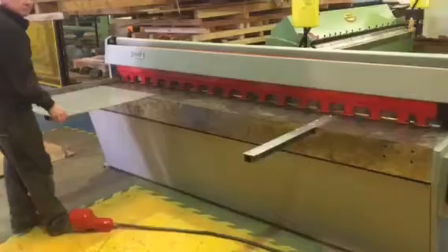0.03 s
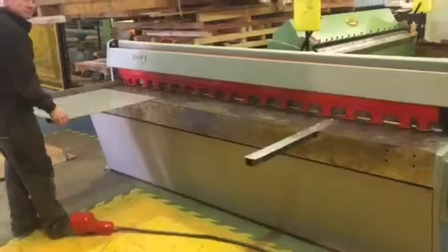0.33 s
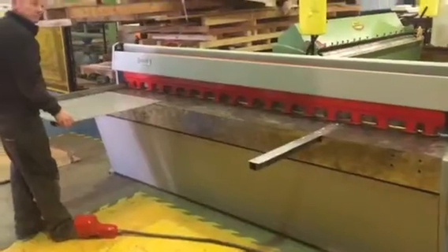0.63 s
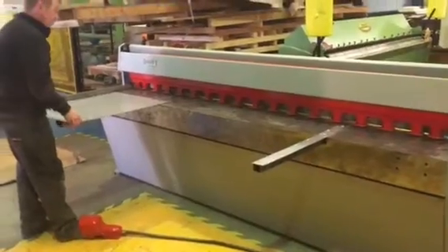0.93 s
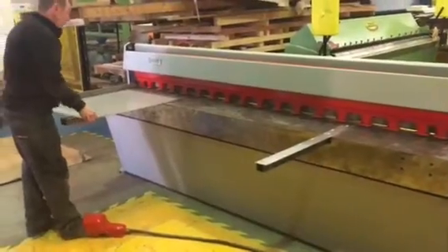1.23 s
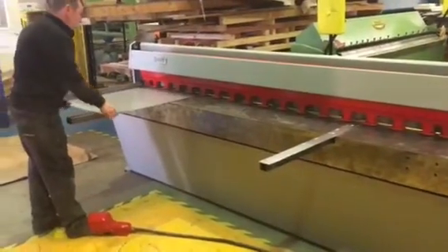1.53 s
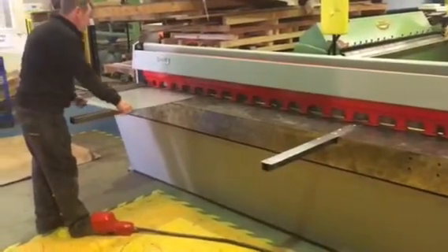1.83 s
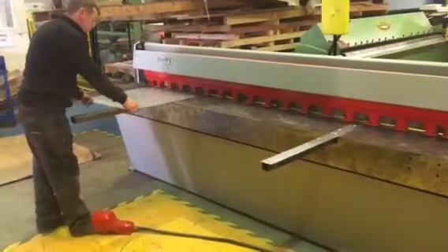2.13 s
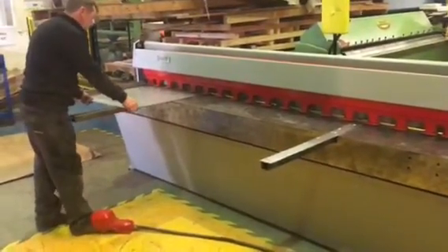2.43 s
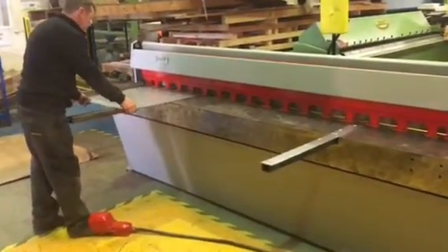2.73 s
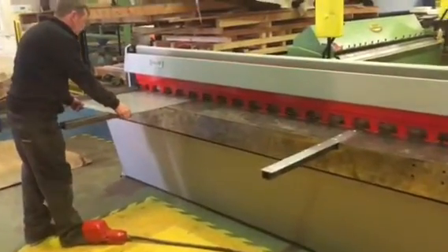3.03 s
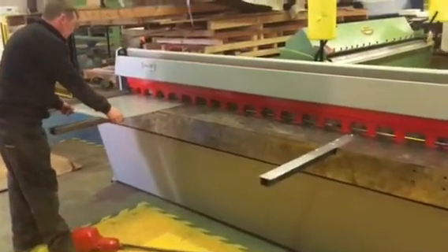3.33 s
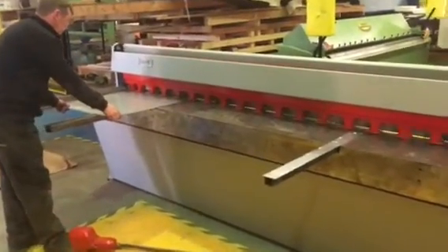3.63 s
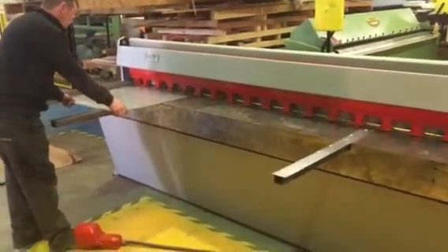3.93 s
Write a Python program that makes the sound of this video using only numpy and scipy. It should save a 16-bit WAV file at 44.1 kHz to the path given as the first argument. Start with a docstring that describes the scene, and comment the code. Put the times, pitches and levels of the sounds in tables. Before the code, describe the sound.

A sheet metal shear cuts once in a workshop. Over its idling hum, a sheet slides into place; a loud clank, juddering groan and crunch follow, then the offcut clinks, skids and briefly screeches as the blade knocks back.

```python
"""A workshop: a motor-driven guillotine shear idles while a steel sheet scrapes over its table.
The clutch bangs in, ringing the frame; the clamp judders down with a groan; the blade crunches through
and the strip snaps off. The gear whine sags and recovers, the strip clatters down behind in its
plate modes, and the beam knocks home over ringing steel."""
import sys
import numpy as np
from scipy import signal
from scipy.fft import rfft, irfft
from scipy.io import wavfile
from scipy.ndimage import map_coordinates

SR = 44100
rng = np.random.default_rng(int(sys.argv[2]) if len(sys.argv) > 2 else 0)


def wav_out(sig):
    """Save sig, one row per channel (or a flat mono array), as 16-bit PCM at SR to the path in sys.argv[1]."""
    wavfile.write(sys.argv[1], SR, np.round(np.clip(np.atleast_2d(sig).T, -1, 1) * 32767).astype(np.int16))


N = 4 * SR


def undb(db):
    return 10 ** (np.asarray(db) / 20)


def unit_rms(x):
    return x / np.sqrt(np.mean(x ** 2))


def clock():
    return np.arange(N) / SR


def curve(table, column=1):
    """One table column, linear in time between rows."""
    rows = np.array(table)
    return np.interp(clock(), rows[:, 0], rows[:, column])


def colour(x, points, centre_hz=1000, half_width_oct=None):
    """Minimum-phase filter of unit RMS gain through (Hz, dB) points, with an optional bell."""
    n, rows = 2 * len(x), np.array(points)
    log_f = np.log2(np.maximum(np.fft.rfftfreq(n, 1 / SR), 1))
    db = np.interp(log_f, np.log2(rows[:, 0]), rows[:, 1])
    if half_width_oct:
        db -= 20 * np.log10(1 + ((log_f - np.log2(centre_hz)) / half_width_oct) ** 2)
    cepstrum = irfft(np.log(unit_rms(undb(db))))
    cepstrum[1:n // 2] *= 2
    cepstrum[n // 2 + 1:] = 0
    return irfft(rfft(x, n) * np.exp(rfft(cepstrum)))[:len(x)]


def drift(rate_hz):
    """Random drift, unit RMS."""
    knots = rng.standard_normal(4000)
    return unit_rms(np.interp(clock() * rate_hz, np.arange(len(knots)), knots))


def tone(hz, wobble, rate_hz):
    """Unit-RMS sine; pitch wavers by the fraction `wobble`."""
    wavering_hz = hz * (1 + wobble * drift(rate_hz))
    return np.sqrt(2) * np.sin(2 * np.pi * np.cumsum(wavering_hz) / SR)


def chatter(per_s, spread_db, size=N):
    """Random metal contacts of uneven strength."""
    hits = rng.random(size) < per_s / SR
    signs = rng.choice([-1, 1], size)
    return unit_rms(hits * signs * undb(spread_db * np.clip(rng.standard_normal(size), -2, 2)))


def dense_ring(t60_s, size=SR):
    """Decaying noise, unit energy."""
    h = rng.standard_normal(size) * undb(-60 * np.arange(size) / SR / t60_s)
    return h / np.linalg.norm(h)


def modal_ring(modes):
    """Sum of damped sines, unit energy."""
    t = np.arange(SR) / SR
    h = sum(undb(db - 60 * t / t60) / np.sqrt(t60) * np.sin(2 * np.pi * hz * t) for hz, db, t60 in modes)
    return h / np.linalg.norm(h)


def convolve(x, h):
    return signal.fftconvolve(x, h)[:len(x)]


def swell(at_s, sigma_s):
    return np.exp(-.5 * ((clock() - at_s) / sigma_s) ** 2)


# Machine and workshop noise: f/Hz, gain/dB
IDLE_SPECTRUM = [(25, -34), (55, -1.5), (115, -4.5), (155, -19.5), (230, -5.5), (380, -6.5), (480, -15.5),
                 (1300, -18.5), (2100, -21.5), (2700, -31.5), (9000, -38), (15500, -39)]
# Panel resonances: f/Hz, width/Hz, level/dB
PANEL_BANDS = [(75, 13, -51.5), (198.3, 37, -41), (236.9, 21.6, -42.5)]
# Hum: f/Hz, level/dB
HUM_TONES = [(98.5, -47), (614, -52.5)]
# Motor whine: t/s, level/dB
WHINE_ENVELOPE = [(0, -49), (1.2, -47.5), (1.32, -46.5), (1.75, -59)]


def motor_idle(whine_hz=1029):
    """Motor and flywheel: droning panels, hum and a thin whine over workshop noise."""
    out = undb(-38.5 + 0.15 * drift(4.55)) * colour(rng.standard_normal(N), IDLE_SPECTRUM)
    f = np.fft.rfftfreq(N, 1 / SR)
    for hz, width_hz, db in PANEL_BANDS:
        band = rfft(rng.standard_normal(N)) / (1 + (2 * (f - hz) / width_hz) ** 2)
        out += undb(db) * unit_rms(irfft(band, N))
    for hz, db in HUM_TONES:
        out += undb(db + drift(7.1)) * tone(hz, 0.0057, 25.04)
    return out + undb(curve(WHINE_ENVELOPE) + 0.72 * drift(17.8)) * tone(whine_hz, 0.0015, 9.75)


# Sheet on table: t/s, level/dB
SCRAPE_ENVELOPE = [(.88, -70), (1.0, -45), (1.28, -42), (1.66, -40.5), (1.85, -47), (1.93, -40),
                   (2.03, -44), (2.2, -57)]
# Scrape: f/Hz, gain/dB
SCRAPE_SPECTRUM = [(200, 4.5), (700, 4.5), (2600, -7), (3250, -5.5), (4000, -8), (6400, -5.5), (7600, -11),
                   (9400, -7.5), (10500, -19)]
# Sheet catches: t/s
SCUFF_TIMES_S = [1.902, 1.926, 1.992]
# Squeals: t/s, sigma/s, f/Hz, level/dB, wobble/fraction
SHEET_SQUEALS = [(1.307, 0.024, 1055, -44, .04), (1.38, 0.15, 6540, -50, 0.0072)]


def sheet_slide():
    """The sheet scrapes over the table, catches and briefly squeals."""
    scuff_db = 5 * sum(swell(at, sigma_s=0.004) for at in SCUFF_TIMES_S)
    scrape = colour(chatter(9000, 2.3), SCRAPE_SPECTRUM)
    scrape *= undb(curve(SCRAPE_ENVELOPE) + scuff_db + 1.4 * drift(70))
    squeals = sum(undb(db) * swell(at, sigma_s) * tone(hz, wobble, 450)
                  for at, sigma_s, hz, db, wobble in SHEET_SQUEALS)
    return scrape + squeals


# Blows: t/s, level/dB, hold/s, release/s, centre/Hz, half-width/oct
FRAME_BLOWS = [(2.408, -29, 0.0032, 0.01, 3020, 4.3), (2.43, -13.5, 0.022, 0.011, 3600, 0.55),
               (2.433, -18, 0.024, 0.083, 1170, 3.4), (2.497, -25, 0.045, 0.021, 1070, 0.45),
               (2.69, -17.5, 0.051, 0.046, 487, 0.76), (2.776, -9.5, 0.027, 0.043, 450, 1.94),
               (2.886, -13.5, 0.026, 0.039, 5900, 0.84), (2.897, -15.5, 0.019, 0.027, 1540, 0.71),
               (3.631, -18, 0.021, 0.025, 420, 1.7), (3.66, -13, 0.029, 0.028, 1020, 1.55),
               (3.661, -15.5, 0.052, 0.018, 356, 0.19), (3.674, -19, 0.022, 0.023, 3820, 0.45),
               (3.705, -21, 0.027, 0.022, 105, 0.45)]
# Frame: f/Hz, gain/dB
FRAME_SPECTRUM = [(30, -34), (105, 13), (380, -0.5), (480, -8), (650, 1), (1300, -3), (3500, -6),
                  (6500, -14), (15500, -16.5)]


def frame_blows(attack_s=0.001):
    """Clutch, blade, snap and return: each a burst of contacts ringing its own band of the frame."""
    out, t = np.zeros(N + SR), np.arange(SR // 2) / SR
    for at, db, hold_s, release_s, hz, half_width_oct in FRAME_BLOWS:
        envelope = np.minimum(t / attack_s, 1) * np.exp(-np.maximum(t - hold_s, 0) / release_s)
        contacts = unit_rms(convolve(chatter(1900, 2.3, size=len(t)), dense_ring(0.014, size=1024)))
        i = int(at * SR)
        out[i:i + len(t)] += undb(db) * colour(contacts * envelope, FRAME_SPECTRUM, hz, half_width_oct)
    return out[:N]


# Frame modes: f/Hz, level/dB, T60/s
FRAME_RESONANCES = [(76.1, 7.5, 0.38), (101.3, 0, 0.29), (751, -5.5, 0.24), (1279, 3, 0.43)]


def frame_ring(drive):
    """The frame rings on in its low modes."""
    return undb(-20) * convolve(drive, modal_ring(FRAME_RESONANCES))


# Blade and linkage load: t/s, crunch/dB, rumble/dB
LOAD_ENVELOPE = [(2.42, -34, -55), (2.46, -20.5, -27), (2.66, -21, -23.5), (2.75, -20, -17.5),
                 (2.8, -14, -17), (2.98, -20, -22), (3.08, -23, -35.5), (3.5, -28.5, -32.5),
                 (3.8, -25, -31.5), (4, -27.5, -43)]
# Crunch: f/Hz, gain/dB
CRUNCH_SPECTRUM = [(100, -27.5), (270, 7.5), (500, 0.5), (1500, 0.5), (2600, -5), (3400, -7.5), (6500, -16),
                   (15500, -54)]
# Rumble: f/Hz, gain/dB
RUMBLE_SPECTRUM = [(25, -18), (72, 0), (120, 9), (160, -6.5), (300, -1.5), (2000, -53.5)]
# Steel grinding and tearing: t/s, level/dB
TEAR_ENVELOPE = [(2.43, -33), (2.55, -31), (2.66, -37.5), (2.695, -27.5), (2.74, -25), (2.8, -22.5),
                 (2.86, -24), (2.93, -24), (3.0, -31), (3.1, -37.5), (3.25, -41.5)]
# Sheet steel, tearing or skidding: f/Hz, gain/dB
STEEL_SPECTRUM = [(2750, -16.5), (3200, 2), (4400, -4), (4900, -6), (9500, -4.5), (10300, -9), (15500, -20)]


def blade_stroke():
    """The loaded linkage crunches and rumbles; steel grinds under the clamp and tears along the blade."""
    crunch = colour(chatter(2200, 1.06), CRUNCH_SPECTRUM) * undb(curve(LOAD_ENVELOPE) + 1.63 * drift(60))
    rumble = colour(rng.standard_normal(N), RUMBLE_SPECTRUM) * undb(curve(LOAD_ENVELOPE, column=2))
    tear = colour(chatter(2500, 1.1), STEEL_SPECTRUM) * undb(curve(TEAR_ENVELOPE) + 1.1 * drift(70))
    return (crunch + rumble + tear) * (clock() > LOAD_ENVELOPE[0][0])


# Judders: t/s, level/dB
CLAMP_JUDDERS = [(2.478, -19), (2.5, -8), (2.517, -12.5), (2.535, -16), (2.553, -3.5), (2.561, -17),
                 (2.623, -12), (2.66, -11), (2.692, -15), (2.732, -11.5)]


def clamp_groan(start_hz=354, sag_hz_per_s=240, rise_s=0.0066):
    """The hold-down judders on the sheet with a sinking groan."""
    t, envelope = clock(), 0
    for at, db in CLAMP_JUDDERS:
        age = np.maximum(t - at, 0) / rise_s
        envelope += undb(db) * age * np.exp(1 - age)
    hz = start_hz - sag_hz_per_s * (t - CLAMP_JUDDERS[0][0])
    return undb(-7.5) * envelope * tone(hz, 0.0306, 90)


def plate_ring(modes_hz, t60_s=0.16, spread_db=6):
    """The strip's high modes, with new strengths for each point of contact."""
    t = np.arange(SR // 3) / SR
    gains = undb(spread_db * np.clip(rng.standard_normal(len(modes_hz)), -2, 1))
    phases = 2 * np.pi * rng.random((len(modes_hz), 1))
    h = gains @ np.sin(2 * np.pi * modes_hz[:, None] * t + phases) * undb(-60 * t / t60_s)
    return h / np.linalg.norm(h)


# Strip impacts: t/s, level/dB
STRIP_CLINKS = [(2.888, -15), (3.127, -12.5), (3.179, -22), (3.259, -23), (3.317, -24), (3.357, -18),
                (3.412, -30), (3.452, -29), (3.55, -22), (3.564, -27), (3.638, -20), (3.673, -20),
                (3.735, -19), (3.788, -14), (3.801, -16), (3.981, -19.5)]
# Clink: f/Hz, gain/dB
CLINK_SPECTRUM = [(1000, -6.5), (4900, -9.5), (5600, -0.5), (7600, -2.5), (9500, -8.5), (12000, -11.5),
                  (15500, -23)]


def strip_clinks(modes_hz, decay_s=0.019):
    """The cut strip hits the frame; each burst of contacts rings its plate modes."""
    out, t = np.zeros(N + SR), np.arange(SR // 2) / SR
    for at, db in STRIP_CLINKS:
        contacts = chatter(6000, 2.9, size=len(t)) * np.exp(-t / decay_s)
        ringing = convolve(contacts, plate_ring(modes_hz))
        i = int(at * SR)
        out[i:i + len(t)] += undb(db) * (undb(-2.5) * contacts + undb(-10) * ringing)
    return colour(out[:N], CLINK_SPECTRUM)


# Gear mesh: t/s, f/Hz, level/dB
MESH_TRACK = [(2.95, 245.5, -53), (3.1, 237, -29), (3.27, 226.9, -32.5), (3.45, 220.2, -28.5),
              (3.62, 230.5, -26.5), (3.85, 251.3, -32), (4, 253.3, -56)]
# Mesh partials: frequency ratio, level/dB
MESH_PARTIALS = [(1, -4), (1.33, -8.5), (3.12, -8.5), (5.36, -11), (6.4, -8.5), (9.5, -13.5)]


def gear_whine():
    """The mesh pitch sags with the drive after the cut, then climbs again."""
    mesh_hz = curve(MESH_TRACK)
    envelope = undb(curve(MESH_TRACK, column=2)) * (clock() > MESH_TRACK[0][0])
    return envelope * sum(undb(db + 3.4 * drift(30)) * tone(ratio * mesh_hz, 0.01403, 120)
                          for ratio, db in MESH_PARTIALS)


def flex(x, depth_s=0.0001, rate_hz=30):
    """The strip bends as it moves, so its ringing wavers in pitch."""
    return map_coordinates(x, [(clock() + depth_s * drift(rate_hz)) * SR], mode="nearest")


# Skid: t/s, level/dB
SKID_ENVELOPE = [(3.54, -43), (3.565, -20.5), (3.64, -32.5), (3.73, -24.5), (3.8, -26), (3.87, -24.5),
                 (4, -26)]
# Strip's clearest modes: f/Hz, level/dB, T60/s
STRIP_RESONANCES = [(1687, 8, 0.078), (3057, 3, 0.28), (3330, 8, 0.17), (3700, -9, 0.28), (4150, -9, 0.12)]


def strip_skid(modes_hz, contact_shift_s=0.06):
    """The strip skids and rings, its point of contact shifting in steps."""
    t, start_s = clock(), SKID_ENVELOPE[0][0]
    contacts = chatter(1600, 1.7) * undb(curve(SKID_ENVELOPE) + 2 * drift(40)) * (t > start_s)
    spot = np.maximum(t - start_s, 0) // contact_shift_s
    rattle = sum(convolve(contacts * (spot == k), plate_ring(modes_hz)) for k in np.unique(spot))
    scrape = convolve(contacts, dense_ring(0.046))
    ringing = flex(convolve(contacts, modal_ring(STRIP_RESONANCES)))
    return colour(undb(-3) * scrape + undb(-7) * rattle, STEEL_SPECTRUM) + undb(-5.5) * ringing


def strip_screech(hz=1703, onset_s=3.734, attack_s=0.001, decay_s=0.14):
    """The skidding strip screeches: a fading tone and its octave, with one sharp peak."""
    age_s = np.maximum(clock() - onset_s, 0)
    tail = undb(-23.5) * (1 - np.exp(-age_s / attack_s)) * np.exp(-age_s / decay_s)
    peak = undb(-15) * swell(at_s=3.771, sigma_s=0.005)
    squeak = tone(hz, 0.0248, 500) + undb(-10) * tone(2 * hz, 0.0159, 550)
    return (peak + tail) * squeak


def cut_strip(mode_count=110, low_hz=2920, high_hz=15220):
    """The falling strip: clinks and skid share one set of plate modes; a screech joins them."""
    positions = (np.arange(mode_count) + rng.random(mode_count)) / mode_count
    modes_hz = low_hz + (high_hz - low_hz) * positions
    return strip_clinks(modes_hz) + strip_skid(modes_hz) + strip_screech()


def workshop_reverb(x, t60_s=0.55):
    """Dense, bright reflections off the room."""
    response = colour(dense_ring(t60_s), [(100, -7.5), (2000, 2.5), (6400, 3.5), (15000, -7)])
    return convolve(x, response)


def scene():
    """Mono mix; only frame, blade and strip feed the reverb."""
    frame = frame_blows() + blade_stroke()
    shear = frame + frame_ring(frame) + cut_strip()
    in_room = undb(-2) * shear + undb(-11.5) * workshop_reverb(shear)
    return (in_room + clamp_groan() + gear_whine() + sheet_slide() + motor_idle())[None]


def record(dry):
    """Soft-clipped peaks, a brief opening silence, steep low-pass."""
    ceiling, start_s, cutoff_hz = 0.85, 0.084, 15850
    clipped = ceiling * np.tanh(dry / ceiling) * (clock() > start_s)
    return signal.sosfilt(signal.ellip(10, .2, 80, cutoff_hz, fs=SR, output="sos"), clipped)


dry = scene()
out = record(dry)
wav_out(out)
```